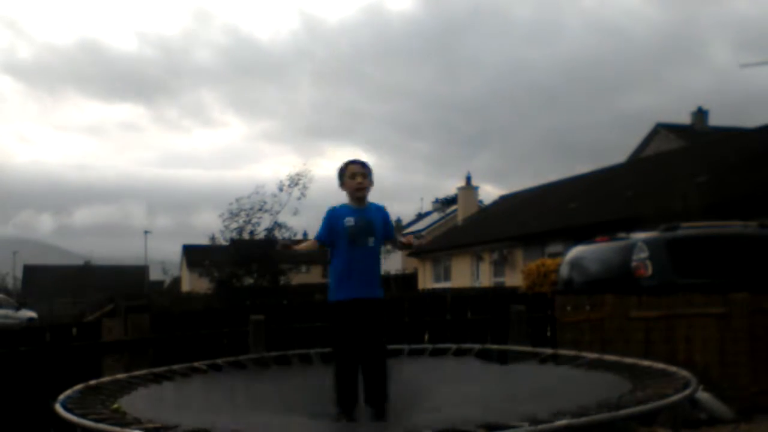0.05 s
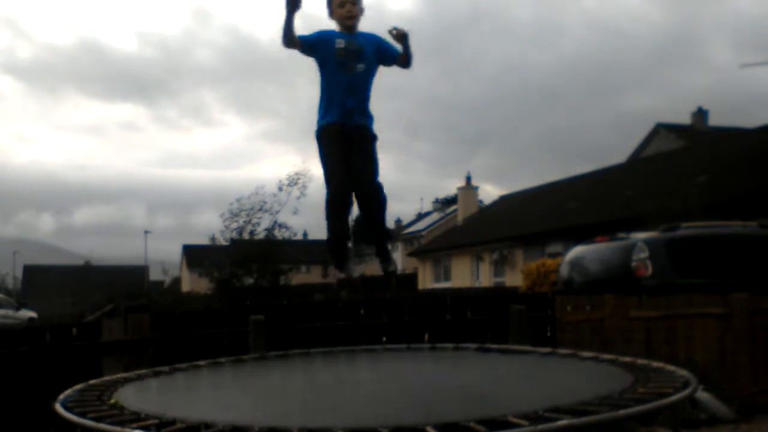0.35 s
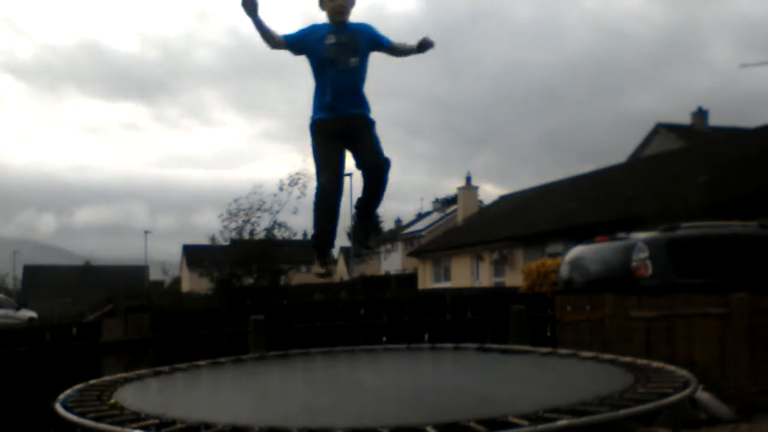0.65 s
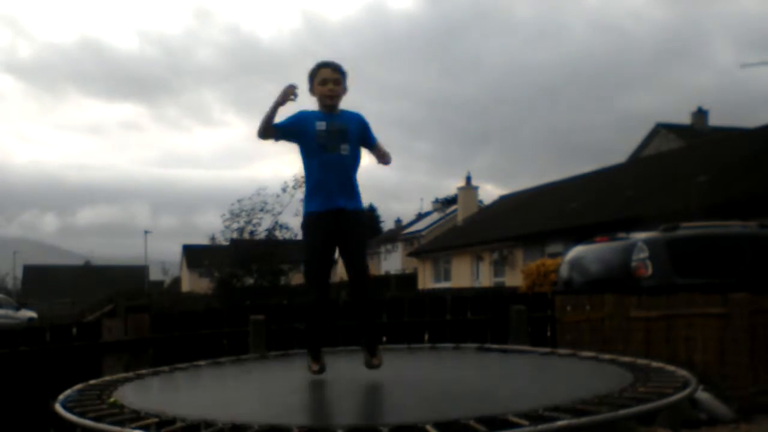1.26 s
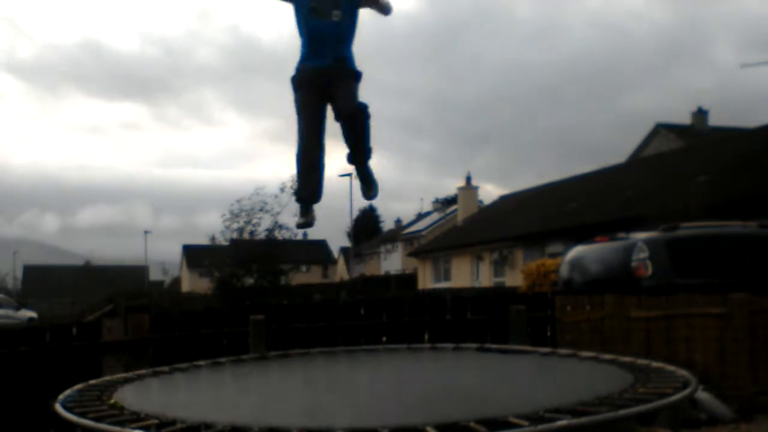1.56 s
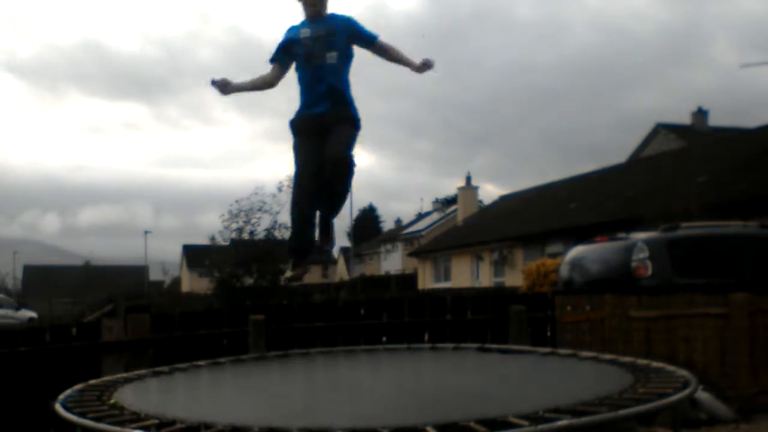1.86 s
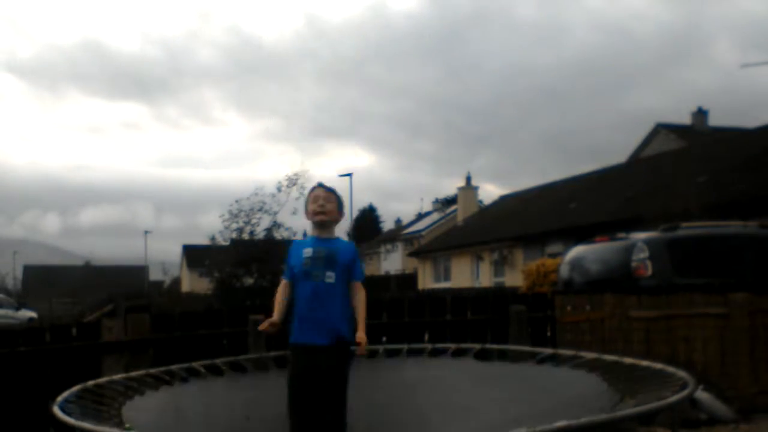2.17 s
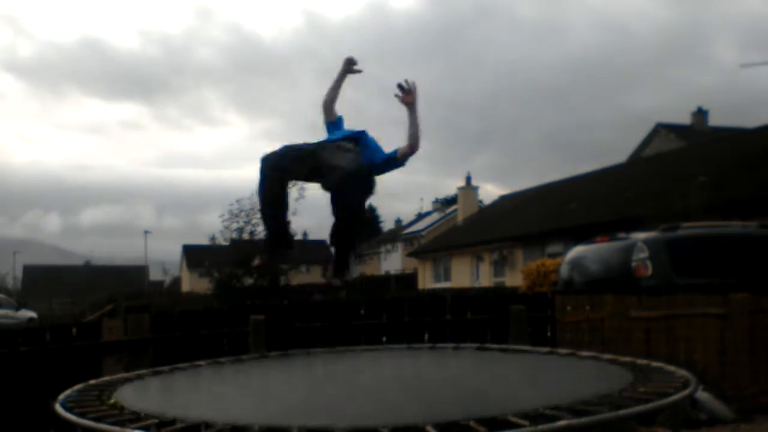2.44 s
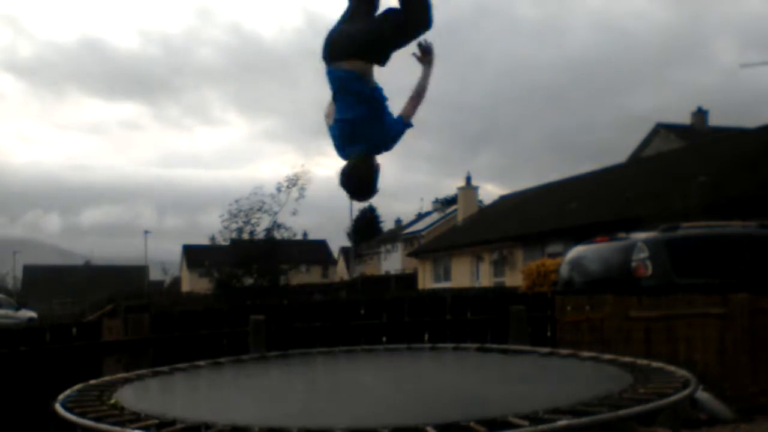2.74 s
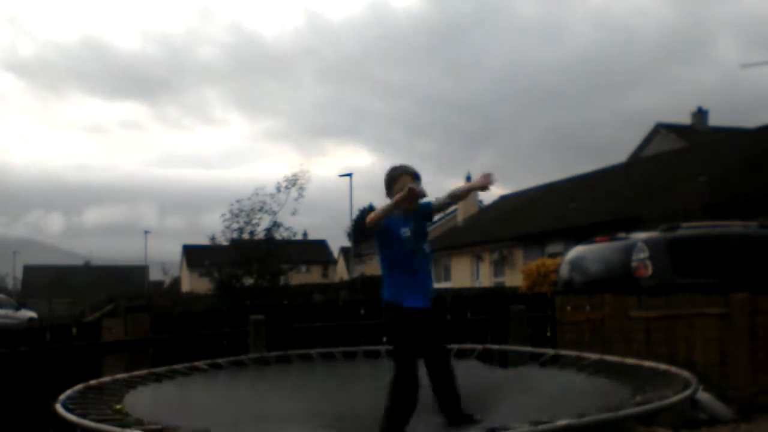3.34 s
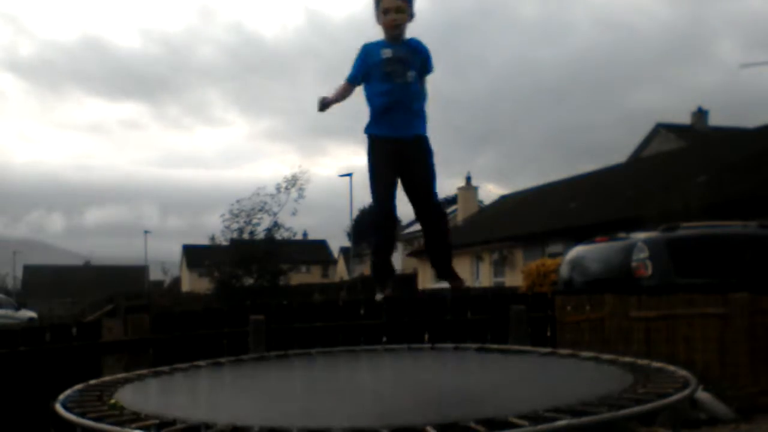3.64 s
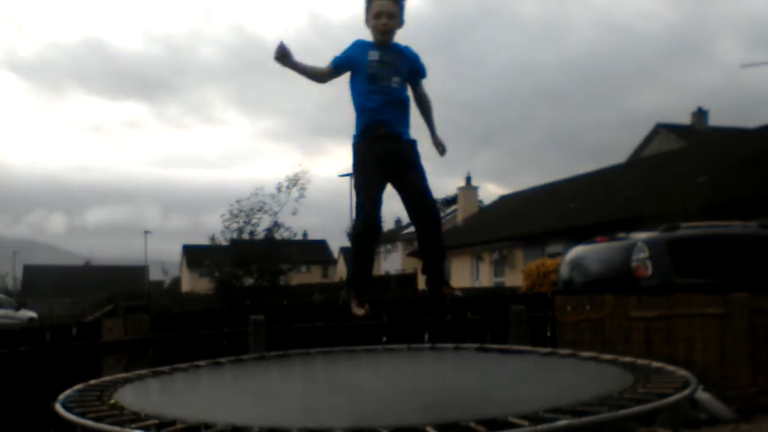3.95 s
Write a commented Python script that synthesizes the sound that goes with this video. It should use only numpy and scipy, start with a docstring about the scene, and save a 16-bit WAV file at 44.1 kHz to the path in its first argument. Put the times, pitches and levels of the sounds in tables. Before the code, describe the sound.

Trampoline springs creak and rattle as a child bounces outdoors, with gritty metal bursts at the start and around 1, 2.2 and 3.2 seconds. The landings bring small knocks and a thin ringing, with short high squeals near 2.2 and 3.3 seconds. The mat gives a dull scuff at 2.5 seconds. Gusts of wind rumble and thump on the microphone throughout, over a faint outdoor wash.

```python
"""Gritty steel creaks come about once a second: a child bouncing on a garden trampoline.
On each landing the spring hooks stick and slip on the frame, knock in their holes and squeal,
and the springs ring on as the mat lets go. Gusts buffet the microphone, and behind it all sit
a quiet outdoor wash, a distant bird and the camera's faint whine."""
import sys
import numpy as np
from scipy import signal
from scipy.fft import rfft, irfft
from scipy.io import wavfile
from scipy.ndimage import uniform_filter1d

SR = 44100
rng = np.random.default_rng(int(sys.argv[2]) if len(sys.argv) > 2 else 0)


def dump_mix(stems):
    """Bounce the given channels to the path in sys.argv[1] as a 16-bit WAV at rate SR."""
    frames = np.atleast_2d(stems).T  # one column per channel
    limited = np.clip(frames, -1, 1)  # hard clip at full scale
    pcm = np.round(limited * 32767).astype(np.int16)
    wavfile.write(sys.argv[1], SR, pcm)


N = 176400


def amp(db):
    """Decibels to gain."""
    return 10 ** (np.asarray(db) / 20)


def eq_gain(curve, size):
    """Gain per FFT bin of an EQ curve (f/Hz, level/dB), drawn on a log-frequency axis."""
    hz, db = np.array(curve, float).T
    bins = np.fft.rfftfreq(size, 1 / SR)
    return amp(np.interp(np.log(bins + 1e-3), np.log(hz), db))


def colour(x, curve, size=8192):
    """Minimum-phase EQ that keeps the power of white noise."""
    gain = eq_gain(curve, size)
    cepstrum = irfft(np.log(gain / np.sqrt(np.mean(gain ** 2))))
    cepstrum[1:size // 2] *= 2
    cepstrum[size // 2 + 1:] = 0
    return signal.fftconvolve(x, irfft(np.exp(rfft(cepstrum))))[:len(x)]


def fade(t, t60):
    """Exponential decay from t = 0, silence before."""
    return (t >= 0) * np.exp(-np.log(1000) * np.maximum(t, 0) / max(t60, 1e-3))


def unit(x):
    """Scale to unit energy."""
    return x / np.sqrt(np.sum(x ** 2))


def add(out, x, start):
    """Mix a sound in at a time in seconds."""
    i = int(start * SR)
    x, i = x[max(-i, 0):], max(i, 0)
    out[i:i + len(x)] += x[:N - i]


def drift(rate_hz):
    """Smooth random modulation with unit spread."""
    step = int(SR / rate_hz)
    wander = uniform_filter1d(np.repeat(rng.standard_normal(2000), step)[:N], step)
    return wander / wander.std()


def yard(x, size=14000):
    """Faint scatter from fences and walls, different left and right."""
    tail = fade(np.arange(size) / SR, t60=0.45)
    echoes = [unit(rng.standard_normal(size) * tail) for _ in range(2)]
    return amp(-24) * np.array([signal.fftconvolve(x, echo)[:N] for echo in echoes])


# tone of the outdoor wash: f/Hz, level/dB
AIR_EQ = [(60, 13.5), (200, -8), (400, -3.5), (800, -0.5), (1500, -7), (2500, -12), (4000, -18),
          (5600, -13), (6400, -18), (7200, -30.5), (16000, -34)]
# fader ride on the wash: t/s, level/dB
AIR_RIDE = [(0, -55), (1.5, -54.5), (1.73, -51.5), (1.9, -55.5), (4, -53)]
# partials of the camera's whine: f/Hz, level/dB
WHINE_TONES = [(3162, -72), (6325, -73)]

def background(t):
    """The bed: a distant outdoor wash and the camera's thin whine."""
    air = colour(rng.standard_normal(N), AIR_EQ)
    air *= amp(np.interp(t, *np.array(AIR_RIDE).T) + 0.51 * drift(6.81))
    return air + sum(amp(db) * np.sqrt(2) * np.sin(2 * np.pi * hz * t) for hz, db in WHINE_TONES)


# bird chirps: t/s, level/dB, start f/Hz, end f/Hz
BIRD_CHIRPS = [(2.64, -70, 4030, 4360), (3.78, -70, 4840, 4100)]

def bird(length_s=0.084, waver=0.023):
    """Faint, wavering glides from a bird far off."""
    progress, out = np.linspace(0, 1, int(length_s * SR)), np.zeros(N)
    swell = np.sin(np.pi * progress)
    for start, db, from_hz, to_hz in BIRD_CHIRPS:
        glide = from_hz + (to_hz - from_hz) * progress
        hz = glide * (1 + waver * drift(1000)[:len(glide)])
        add(out, amp(db) * np.sqrt(2) * swell * np.sin(2 * np.pi * np.cumsum(hz) / SR), start)
    return out


def eddy(t, width_s):
    """The pressure pulse of one eddy, passing at t = 0."""
    return 1 / (1 + (t / width_s) ** 2) ** 1.5


# tone of the wind rumble: f/Hz, level/dB
RUMBLE_EQ = [(12, -9), (25, -3), (50, 1), (75, -1), (110, -10.5), (160, -15.5), (400, -44), (1000, -82.5)]
# gusts: t/s, hold/s, level/dB
WIND_GUSTS = [(0.396, 0.083, -33.5), (0.537, 0.17, -32), (0.707, 0.3, -29.5), (1.018, 0.39, -37.5),
              (1.556, 0.26, -33.5), (2.086, 0.12, -35.5), (2.487, 0.14, -41), (2.81, 0.056, -32),
              (3.007, 0.084, -32), (3.339, 0.083, -29), (3.55, 0.14, -32.5), (3.72, 0.35, -40)]
# thumps of single large eddies: t/s, peak level before the low cut/dB, width/ms
WIND_THUMPS = [(.256, -19, 2.14), (0.602, -14, 4.4), (0.772, -12.5, 1.92), (0.823, -18.5, 2.5),
               (.853, -24.5, 1.85), (0.945, -8.5, 5.1), (1.346, -23, 1.44), (1.387, -20, 1.8),
               (1.497, -18.5, 3.5), (1.606, -8.5, 6.7), (1.664, -14.5, 3.9), (1.758, -15.5, 2.36),
               (2.13, -19, 2.2), (2.158, -15.5, 2.06), (3.052, -14.5, 2.56), (3.225, -10.5, 2.22),
               (3.69, -13.5, 2.8), (3.83, -15, 2.12), (3.888, -17, 1.93)]

def wind(t, breeze_db=-43.5, eddies_per_s=60, flutter_db=8, port_hz=38.7):
    """Wind on the microphone port: gusty rumble, a flutter of small eddies and thumps from big ones."""
    gust_power = np.zeros(N)
    for start, hold, db in WIND_GUSTS:
        rise = np.clip((t - start) / 0.0067, 0, 1)
        gust_power += (amp(db) * rise * fade(np.maximum(t - start - hold, 0), t60=0.12)) ** 2
    rumble = colour(rng.standard_normal(N), RUMBLE_EQ)
    rumble /= np.sqrt(uniform_filter1d(rumble ** 2, size=2600))  # level it, so the gusts set the shape
    rumble *= np.sqrt(gust_power + amp(breeze_db) ** 2) * amp(1.5 + 2.7 * drift(30))
    arrivals = rng.random(N) < eddies_per_s / SR
    pushes = arrivals * rng.uniform(-0.76, 1, N) * np.sqrt(gust_power)
    flutter = amp(flutter_db) * signal.fftconvolve(pushes, eddy(t - t.mean(), width_s=0.0035), "same")
    thumps = sum(amp(db) * eddy(t - start, ms / 1000) for start, db, ms in WIND_THUMPS)
    low_cut = signal.butter(2, port_hz, "high", fs=SR, output="sos")
    return rumble + signal.sosfilt(low_cut, flutter + thumps)


# feet shoving off the mat: t/s, level/dB
MAT_SCUFFS = [(2.516, -38.5)]

def mat(t):
    """A dull scuff of fabric at take-off."""
    fabric_eq = [(100, -15), (260, -1), (900, -13), (5000, -76)]  # f/Hz, level/dB
    envelope = sum(amp(db) * fade(t - start, t60=0.29) for start, db in MAT_SCUFFS)
    return colour(rng.standard_normal(N) * envelope, fabric_eq)


# squealing hooks: t/s, level/dB, f/Hz, pitch scatter/Hz, t60/s
HOOK_SQUEALS = [(.71, -52.5, 3730, 324, 0.28), (1.059, -43, 1154, 273, 0.28),
                (2.222, -32, 3034, 110, 0.086), (2.232, -29.5, 3680, 222, 0.072),
                (3.183, -51.5, 2090, 109, 0.22), (3.29, -35.5, 1057, 90, 0.086),
                (3.325, -28, 5650, 397, 0.15), (3.345, -46.5, 1554, 70, 0.5)]

def squeals(attack_s=0.0025, size=16000):
    """A hook squeals on one resonance: a rough tone that flares and fades."""
    t, out = np.arange(size) / SR, np.zeros(N)
    for start, db, hz, scatter_hz, t60 in HOOK_SQUEALS:
        turns = np.cumsum(hz + scatter_hz * drift(1000)[:size]) / SR
        envelope = np.minimum(t / attack_s, 1) * fade(t, t60)
        add(out, amp(db) * np.sqrt(2) * np.sin(2 * np.pi * turns) * envelope, start)
    return out


# springs left ringing: t/s, level/dB, f/Hz, overtone trim/dB, swell/s, neighbours' relative level/dB
SPRING_TWANGS = [(0.189, -41.5, 3022, 1, 0.045, -11.5), (1.11, -47.5, 3108, 3, 0.011, -1),
                 (2.225, -46, 3060, -2, 0.018, -4), (3.525, -47, 3045, -3.5, 0.0093, -0.5),
                 (3.563, -57, 2996, 2, 0.0033, -5)]
# partials of one spring: ratio to its pitch, level/dB, t60/s
COIL_MODES = [(1., 1.5, 0.84), (1.862, 7.5, 0.17), (2.80, -4.5, 0.18)]

def twangs(neighbours=5, detune=0.009, size=44100):
    """Springs swell into a ring as their load changes; detuned neighbours beat against them."""
    t, out = np.arange(size) / SR, np.zeros(N)
    for start, db, hz, overtone_db, swell_s, neighbour_db in SPRING_TWANGS:
        pitches = hz * (1 + np.append(0, detune * rng.standard_normal(neighbours)))
        shares = np.append(1, np.full(neighbours, amp(neighbour_db) / np.sqrt(neighbours)))
        swell = 1 - np.exp(-t / swell_s)
        for pitch, share in zip(pitches, shares):
            waver = 0.001 * drift(70)[:size]
            rasp = 0.025 * fade(t, t60=0.31) * drift(1500)[:size]  # while the hook still slides
            turns = np.cumsum(pitch * (1 + waver + rasp)) / SR
            ring = np.zeros(size)
            for k, (ratio, mode_db, t60) in enumerate(COIL_MODES):
                partial = np.sin(2 * np.pi * (ratio * turns + rng.random()))
                ring += amp(mode_db + overtone_db * (k > 0)) * partial * fade(t, t60)
            add(out, share * amp(db) * np.sqrt(2) * ring * swell, start)
    return out


def slip_click(size=8000):
    """One slip of a hook: a click and a short clatter of coils."""
    t = np.arange(size) / SR
    click = unit(rng.standard_normal(size) * fade(t, t60=0.011))
    clatter = unit(rng.standard_normal(size) * fade(t, t60=0.065))
    return unit(click + amp(1) * clatter)


# creaks: t/s, attack/s, hold/s, frame drive/dB, spring drive/dB, release t60/s
HOOK_CREAKS = [(-.01, 0.0012, 0.0053, -41, -35.5, 0.21), (0.095, 0.0081, 0.12, -49.5, -49.5, 0.28),
               (0.196, 0.032, 0.0093, -53.5, -44, 0.18), (0.274, 0.0055, 0.0076, -49, -46, 0.25),
               (0.687, 0.0083, 0.0078, -80, -56.5, 0.4), (0.996, 0.068, 0.023, -36, -34.5, 0.16),
               (1.099, 0.015, 0.0075, -41, -35, 0.34), (1.234, 0.029, 0.014, -43, -39.5, 0.27),
               (1.351, 0.022, 0.022, -47, -48, 0.19), (1.629, 0.042, 0.059, -63, -66, 0.14),
               (2.146, 0.0031, 0.023, -48, -46.5, 0.71), (2.204, 0.0047, 0.036, -42.5, -31.5, 0.17),
               (2.267, 0.005, 0.014, -45, -48, 0.82), (2.379, 0.011, 0.052, -46, -42.5, 0.27),
               (2.499, 0.0049, 0.028, -49, -46.5, 0.27), (3.209, 0.0026, 0.0071, -40, -36.5, 0.16),
               (3.248, 0.015, 0.027, -40, -37, 0.25), (3.326, 0.0014, 0.0055, -40.5, -34.5, 0.18),
               (3.395, 0.0056, 0.0078, -49, -46.5, 0.62), (3.563, 0.0033, 0.0091, -52.5, -48.5, 0.5)]

def creaks(slips_per_s=1100, scatter_db=1.5, size=22050):
    """Hooks stick and slip as the mat stretches and recoils, driving the frame and the springs."""
    t = np.arange(size) / SR
    frame, spring = np.zeros((2, N))
    for start, attack, hold, frame_db, spring_db, release in HOOK_CREAKS:
        arrivals = rng.random(size) < slips_per_s / SR
        strengths = amp(scatter_db * np.clip(rng.standard_normal(size), -2, 2))
        slips = arrivals * strengths * rng.choice([-1, 1], size)
        slips /= np.sqrt(uniform_filter1d(slips ** 2, size=560) + 1e-6)  # even out the grit
        force = np.minimum(t / attack, 1) ** 2 * fade(np.maximum(t - attack - hold, 0), release)
        for out, db in ((frame, frame_db), (spring, spring_db)):
            add(out, amp(db) * signal.fftconvolve(slips * force, slip_click()), start)
    return frame, spring


# knocks: t/s, frame drive/dB, spring drive/dB
HOOK_KNOCKS = [(0.164, -61, -41), (1.344, -48.5, -40), (2.111, -47.5, -53), (2.144, -48, -39),
               (2.393, -53, -42), (3.183, -47.5, -57), (3.213, -50, -40), (3.325, -50, -33),
               (3.514, -43.5, -31), (3.569, -55, -39.5)]

def knocks(body_t60=0.09, crack_t60=0.02, size=22050):
    """Hooks snap in their holes: a jolt to the frame and springs, with a bright crack on the front."""
    t = np.arange(size) / SR
    frame, spring, cracks = np.zeros((3, N))
    for start, frame_db, spring_db in HOOK_KNOCKS:
        for out, db, t60 in ((frame, frame_db, body_t60), (spring, spring_db, body_t60),
                             (cracks, spring_db - 12, crack_t60)):
            add(out, amp(db) * rng.standard_normal(size) * fade(t, t60), start)
    return frame, spring, cracks


# midrange body of the frame: f/Hz, level/dB
FRAME_EQ = [(150, -6), (400, -9.5), (700, -1.5), (1100, -1.5), (1500, -1.5), (2200, 4.5), (3000, -6.5),
            (4500, -13.5), (7000, -60), (16000, -75)]
# bright edge of the springs: f/Hz, level/dB
SPRING_EQ = [(500, -27.5), (2000, -25), (3100, -1), (4200, -3), (5200, 2.5), (5950, 1.5), (6500, -10),
             (7300, -20.5), (8700, -24.5), (10500, -34.5), (16000, -42)]
# ringing modes of frame and springs: f/Hz, relative level/dB
STEEL_MODES = [(1082, 17), (1567, 14), (1674, 9.5), (2183, -8), (2990, 22.5), (3156, 13.5), (3722, 6),
               (5816, 8)]

def steel(crisp_full_db=-34.5, crisp_hz=7840, split_hz=2500, ring_db=-9.5, size=22050):
    """Frame and springs radiate the creaks and knocks and ring on; the hardest slips are the crispest."""
    t = np.arange(size) / SR
    frame_creaks, spring_creaks = creaks()
    frame_knocks, spring_knocks, cracks = knocks()
    frame, spring = frame_creaks + frame_knocks, spring_creaks + spring_knocks
    spring_rms = np.sqrt(uniform_filter1d(spring ** 2, size=400) + 1e-12)
    hardness = np.minimum(spring_rms / amp(crisp_full_db), 1)
    treble = signal.butter(2, crisp_hz, "high", fs=SR, output="sos")
    crisp = signal.sosfiltfilt(treble, spring * hardness)
    direct = colour(frame, FRAME_EQ) + colour(spring + crisp, SPRING_EQ) + cracks * hardness
    modes = [(hz, amp(db) * np.sin(2 * np.pi * hz * t) * fade(t, t60=0.22)) for hz, db in STEEL_MODES]
    low = sum(mode for hz, mode in modes if hz <= split_hz)
    high = sum(mode for hz, mode in modes if hz > split_hz)
    ring = (signal.fftconvolve(frame, low) + signal.fftconvolve(spring, high))[:N]
    return direct + amp(ring_db) * ring / np.linalg.norm(low + high)


# stereo tilt of the microphone ports: f/Hz, left minus right level/dB
PORT_TILT = [(100, 1), (1500, 1), (3000, -0.9), (4500, -3.5), (5800, -6), (6800, -2.5), (8200, 3),
             (12000, 10.5)]

def scene():
    """The garden, its echoes and the wind meet at two close ports that differ in tone."""
    t = np.arange(N) / SR
    garden = steel() + twangs() + squeals() + bird() + mat(t) + background(t)
    spectrum = rfft(garden + yard(garden) + wind(t), 2 * N)
    tilt = eq_gain(PORT_TILT, 2 * N)
    pan = 2 * np.array([tilt, np.ones_like(tilt)]) / (1 + tilt)
    return irfft(spectrum * pan)[:, :N]


def record(dry):
    """The camera adds faint hiss and cuts the top."""
    hiss = amp(-76) * rng.standard_normal(dry.shape)
    high_cut = signal.ellip(10, .1, 80, 15850, fs=SR, output="sos")
    return signal.sosfilt(high_cut, dry + hiss)


dry = scene()
out = record(dry)
dump_mix(out)
```